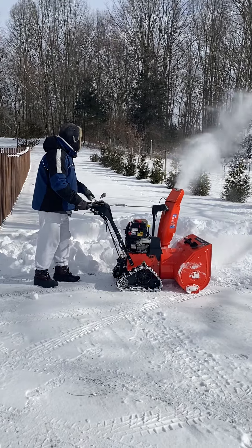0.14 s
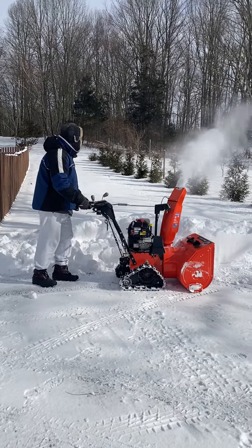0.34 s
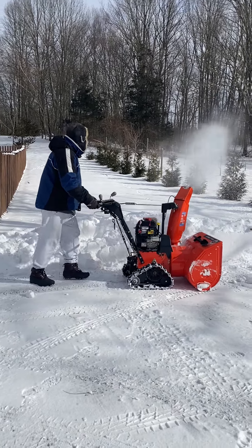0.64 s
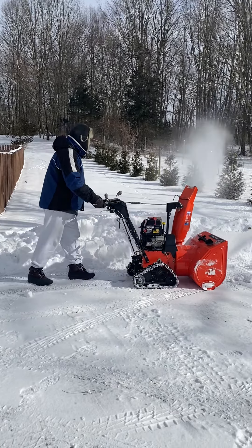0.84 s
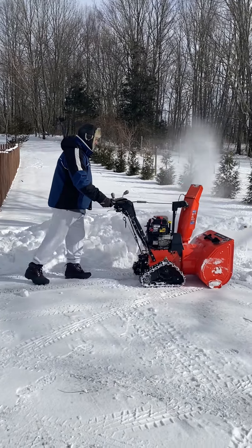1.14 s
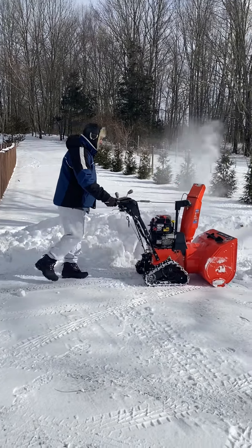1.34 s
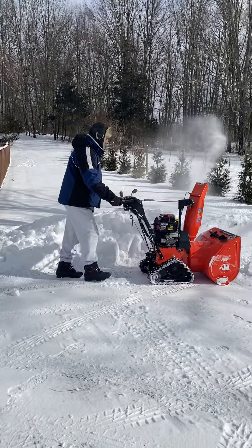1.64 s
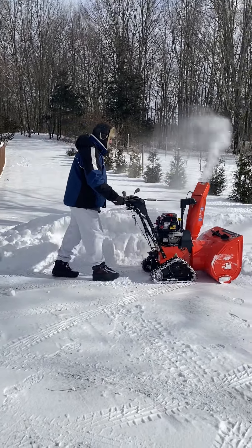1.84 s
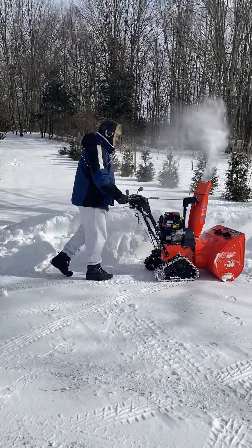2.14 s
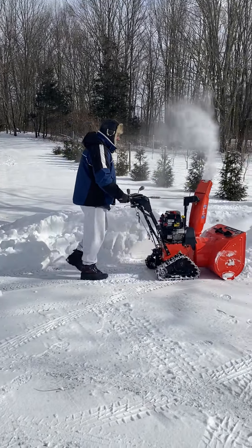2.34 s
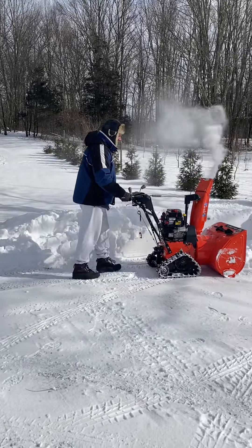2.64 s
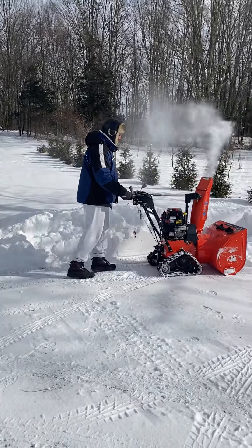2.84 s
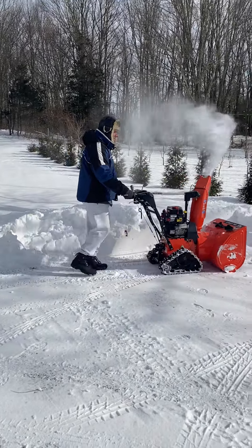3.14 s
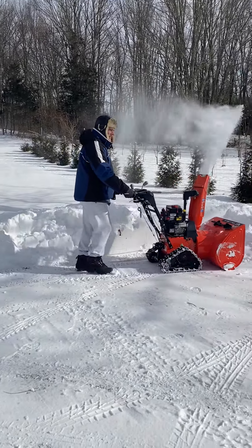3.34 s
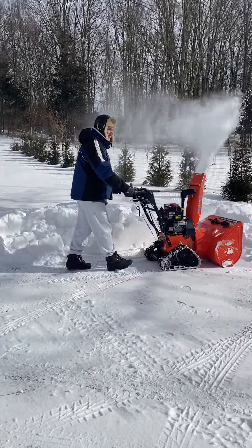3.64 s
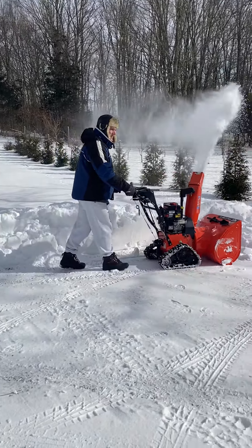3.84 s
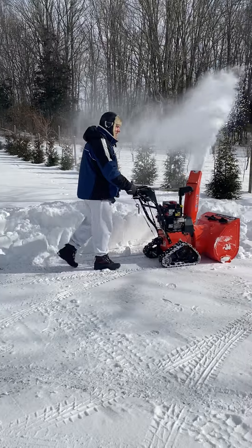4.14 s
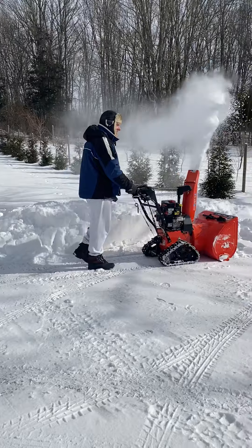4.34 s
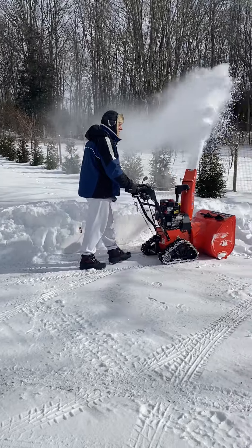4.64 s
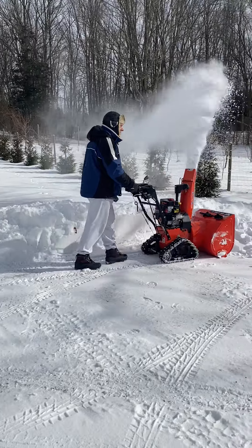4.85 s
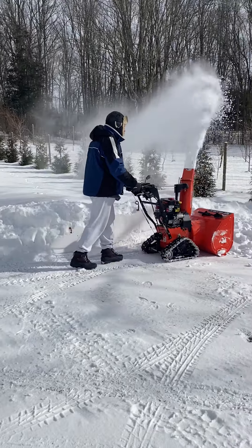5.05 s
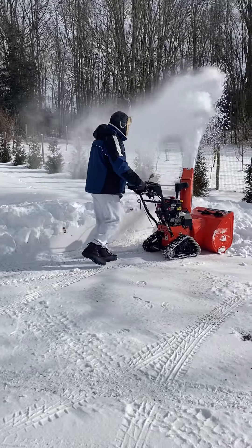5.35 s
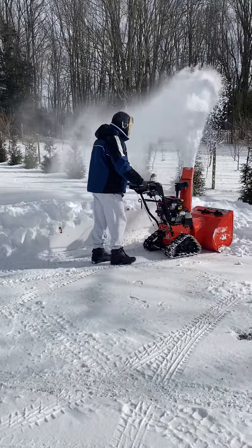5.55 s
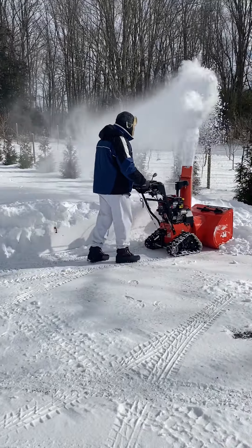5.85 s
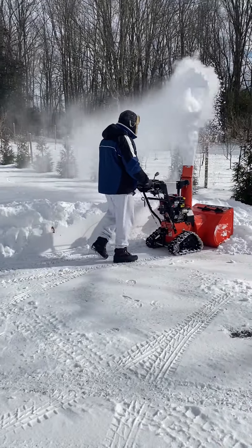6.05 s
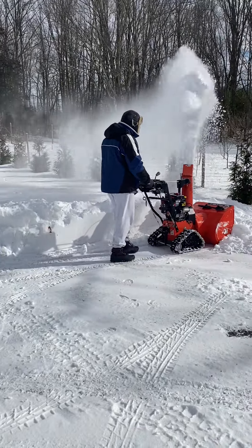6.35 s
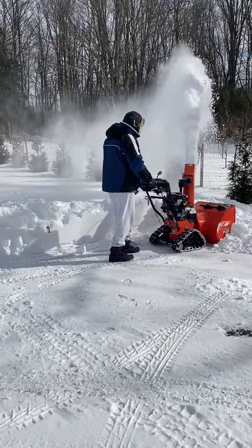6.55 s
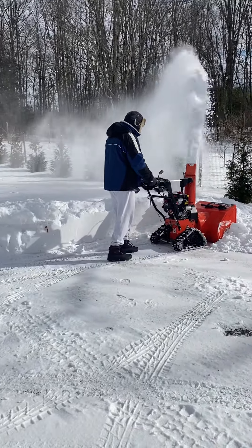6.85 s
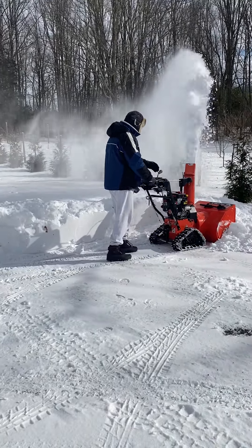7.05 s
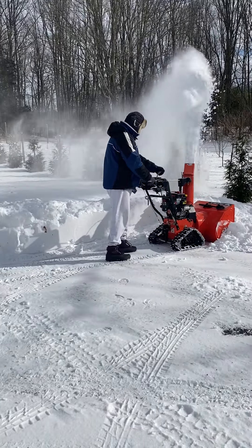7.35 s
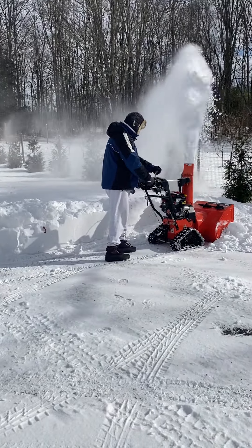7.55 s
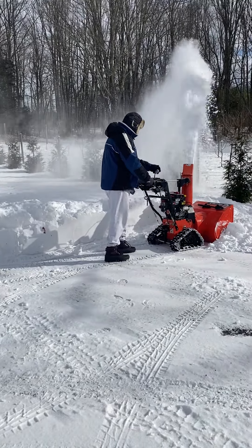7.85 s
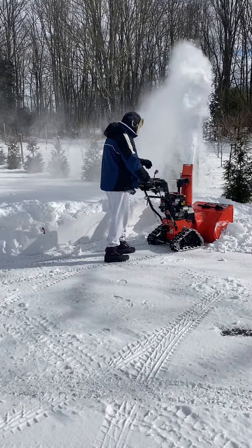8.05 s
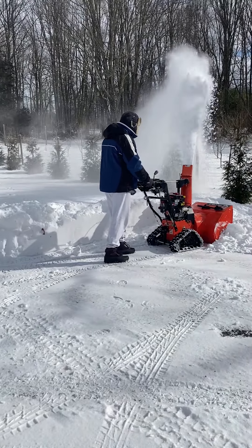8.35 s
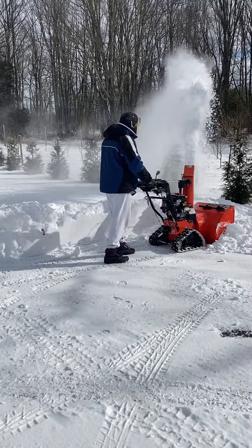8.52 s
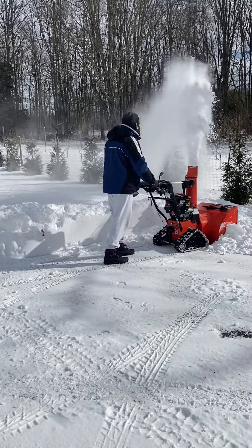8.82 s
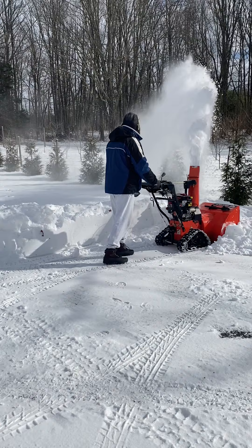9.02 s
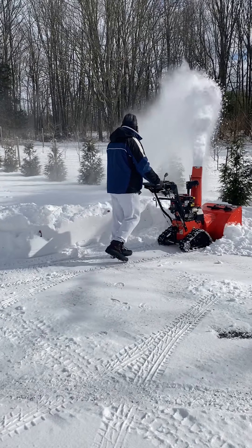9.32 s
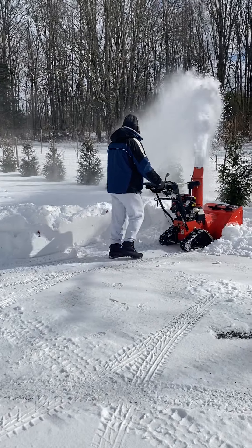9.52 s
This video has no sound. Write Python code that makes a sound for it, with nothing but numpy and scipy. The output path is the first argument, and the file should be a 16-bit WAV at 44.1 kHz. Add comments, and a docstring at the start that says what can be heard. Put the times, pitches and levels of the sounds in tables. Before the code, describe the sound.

A tracked snowblower heard from a few metres in an open yard: first a light, quick engine putter with ringing scrapes, dull bumps and scattered ticks of ice. Then the load rises, the pitch drops and wavers, exhaust blasts harden into a rasp, and a bright snow hiss swells over singing steel panels. A loud double clack strikes near the end while the labouring engine continues, faintly receding.

```python
"""A single-cylinder four-stroke snowblower creeps along: harmonics of its firings, taps and gears over noise.
At first it runs light; ringing scrapes, dull booms and clicks of ice and grit come and go.
From about 4.5 s it bites into a deep bank: the engine sags and drones, noise bursts harden into a rasp,
and filtered noise hisses like snow up the chute, with more grit clicking through the housing.
Near 8.2 s a hard double clack makes a limiter duck; the noise then fades a little as the machine moves off."""
import sys
import numpy as np
from scipy import signal
from scipy.fft import rfft, irfft, next_fast_len
from scipy.io import wavfile
from scipy.ndimage import uniform_filter1d, minimum_filter1d

SR = 44100
rng = np.random.default_rng(int(sys.argv[2]) if len(sys.argv) > 2 else 0)


def persist_wave(psi):
    """Save psi, clipped to +-1, as 16-bit WAV."""
    counts = np.round(np.clip(psi, -1, 1) * 32767).astype(np.int16)
    wavfile.write(sys.argv[1], SR, np.atleast_2d(counts).T)


N = 426888

# the bucket scrapes over crust: (time [s], half-width of the swell [s], level above the growl's base [dB])
SCRAPES = [(0.5, 0.17, 12.5), (1.4, 0.086, 23), (2.075, .07, 21), (2.634, 0.045, 18), (2.847, 0.11, 24.5),
           (4.067, 0.045, 26), (4.38, 0.031, 26), (4.573, 0.1, 23), (6.913, 0.25, 14)]
# exhaust puff running light and under load: (place in the cycle [0-1], smear of the harmonics [rad])
PUFF_LIGHT, PUFF_LOADED = (.7, -.315), (.9, -.6)


def from_db(db):
    """Decibels to gain."""
    return 10 ** (np.asarray(db) / 20)


def rms_one(x):
    """Scale to an average strength (rms) of 1."""
    return x / np.sqrt(np.mean(x ** 2) + 1e-20)


def in_time(rows):
    """Each column of a time table, read at every sample."""
    s, *columns = np.transpose(rows)
    return [np.interp(np.arange(N) / SR, s, column) for column in columns]


def at_hz(points, hz):
    """Read a spectrum table on a log-frequency axis."""
    points = np.array(points)
    return np.interp(np.log(hz + 1e-9), np.log(points[:, 0]), points[:, 1])


def drift(per_s):
    """Smooth random wandering with spread 1; a higher per_s wanders faster."""
    step = 40  # samples between computed points
    r = np.exp(-2 * np.pi * step * per_s / SR)
    kicks = rng.standard_normal(N // step + 2002)
    slow = signal.lfilter([1], [1, -2 * r, r * r], kicks)[2000:]  # drop the start-up
    return np.interp(np.arange(N) / step, np.arange(len(slow)), rms_one(slow))


def noise(spectrum):
    """Noise of a given colour, rms 1."""
    size = next_fast_len(N, True)
    hz = np.arange(size // 2 + 1) * SR / size
    white = rfft(rng.standard_normal(size))
    return rms_one(irfft(white * from_db(at_hz(spectrum, hz)), size)[:N])


def resonate(x, hz, width):
    """One resonance with gain 1 at its top."""
    r = np.exp(-np.pi * width / SR)
    top = np.array([1, 0, -1]) * (1 - r * r) / 2
    return signal.lfilter(top, [1, -2 * r * np.cos(2 * np.pi * hz / SR), r * r], x + 1e-18)


def body(x, modes):
    """A solid part rings at several resonances at once, added with alternating signs."""
    return sum((-1) ** k * from_db(db) * resonate(x, hz, width)
               for k, (hz, width, db) in enumerate(modes))


def each_cycle(cycle, spread_db):
    """A new random gain for every engine cycle."""
    gains = from_db(spread_db * rng.standard_normal(400))
    return gains[np.floor(cycle).astype(int) + 2]


def burst(cycle, place, width):
    """A bell-shaped opening once a cycle."""
    away = cycle - place
    return np.exp(-.5 * ((away - np.rint(away)) / width) ** 2)


def swells(s, length):
    """A bell-shaped swell around one moment."""
    return np.exp(-.5 * ((np.arange(N) / SR - s) / length) ** 2)


def puff_phase(puff, k):
    """Lag of harmonic k: the puff's place in the cycle plus the spread of its echoes in the muffler."""
    place, smear = puff
    return 2 * np.pi * k * place + smear * k * k


def exhaust_note(cycle, speed, load, waver_db=1.0, rough_db=1.45, strain_db=2.6, wander_rad=0.46):
    """Harmonics of the firing rate slide through the muffler's resonances and grow rougher under load."""
    # exhaust note running light, at half load and at full load:
    # (frequency [Hz], peak level of a harmonic there before wavering and exhaust loudness [dB])
    note_light, note_half, note_loaded = [(29, -61), (58, -23), (87, -31), (116, -45.5), (145, -26),
                                          (174, -20.5), (203, -23.5), (232, -32), (261, -25), (290, -35.5),
                                          (330, -57), (410, -44.5), (480, -64)], [(28, -54), (56, -18), (84, -25), (112, -28.5),
                                                              (140, -18), (168, -27.5), (196, -23.5),
                                                              (224, -21.5), (252, -36.5), (280, -47),
                                                              (370, -35), (480, -43.5), (540, -63)], [(27, -69), (52, -17),
                                                                                 (80, -16), (106, -19.5),
                                                                                 (127, -25), (138, -27),
                                                                                 (162, -21.5), (180, -36.5),
                                                                                 (193, -24.5), (208, -17.5),
                                                                                 (231, -36.5), (246, -25),
                                                                                 (285, -42), (345, -64),
                                                                                 (420, -37), (482, -54),
                                                                                 (530, -45)]
    t, coarse = np.arange(N), slice(None, None, 40)  # levels need only every 40th sample
    speed, load = speed[coarse], load[coarse]
    light, heavy = np.maximum(1 - 2 * load, 0), np.maximum(2 * load - 1, 0)
    blend = [(light, note_light), (1 - light - heavy, note_half), (heavy, note_loaded)]
    working = np.interp(t, t[coarse], 1 - light)
    out, together = 0, drift(1.0)[coarse]
    for k in np.arange(1, 21):
        level_db = sum(share * at_hz(note, k * speed) for share, note in blend)
        own_waver_db = (rough_db + strain_db * load) * drift(13.4)[coarse]
        level_db += min(k / 10, 1) * (waver_db * together + own_waver_db)
        # the puff changes shape as the throttle opens; turn each phase the short way round
        turn = puff_phase(PUFF_LOADED, k) - puff_phase(PUFF_LIGHT, k)
        change = np.angle(np.exp(1j * turn))
        lag = puff_phase(PUFF_LIGHT, k) + working * change
        if 3 < k < 9:
            lag = lag + wander_rad * working * drift(4.0)  # no two labouring strokes burn alike
        gain = np.interp(t, t[coarse], from_db(level_db))
        out = out + gain * np.sin(2 * np.pi * k * cycle - lag)
    return out


def lugging(cycle, speed, ease_db=5.0, waver_db=0.2):
    """As the engine sags, every second stroke falls short and a drone grows between the harmonics."""
    # drone tones: (multiple of the firing rate [1], peak level at the deepest sag, before wavering [dB])
    drone_tones = [(3.5, -20), (8.5, -26.5)]
    level_db = -ease_db * (speed - speed.min())  # ease_db quieter for each firing per s above the slowest
    out = 0
    for k, db in drone_tones:
        gain = from_db(db + level_db + waver_db * drift(3.7))
        out = out + gain * np.sin(2 * np.pi * k * cycle + 1.0 * drift(5.8))
    return out


def knocks(cycle, load, level_db=-29, load_db=-5, rattle_width=0.11):
    """Piston and valves tap the block at fixed places in the cycle, each tap with a short loose rattle."""
    # taps in each cycle: (place in the cycle [0-1], relative level [dB])
    tap_places = [(0.021, 1), (0.181, 2.5), (0.439, 0), (.73, 6.5)]
    # engine block and shrouds: (frequency [Hz], width [Hz], level [dB])
    block_modes = [(510.5, 26, 0.5), (609, 36, 4), (687, 130, 1), (836.5, 75, 2.5), (995, 60, -1.5),
                   (1206, 87, -5.5), (1520, 280, -12), (1863, 82, -8), (2216, 64, -6.5), (2830, 160, -17.5),
                   (3165, 86, -13.5), (3720, 136, -12.5)]
    taps = np.zeros(N)
    for place, db in tap_places:
        tap = np.diff(np.floor(cycle - place), prepend=np.floor(-place))  # one click a cycle
        loose = .04 * burst(cycle, place + rattle_width, rattle_width) * rng.standard_normal(N)
        taps += from_db(db) * each_cycle(cycle - place + .5, 1.3) * (tap + loose)
    return from_db(level_db + load_db * load) * rms_one(body(taps, block_modes))


def gears(cycle, load, load_db=-9, waver_db=2.5, place=0.039):
    """Timing gears, loaded by the cam once a cycle, sing thin lines that fade as the engine labours."""
    # whirr: (multiple of the firing rate [1], peak level before wavering and load [dB])
    gear_tones = [(14, -44), (17, -45), (21, -42), (22, -44), (24, -41), (26, -44), (29, -35.5)]
    lines = 0
    for k, db in gear_tones:
        gain = from_db(db + waver_db * drift(0.97))
        lines = lines + gain * np.sin(2 * np.pi * k * (cycle - place) + 0.97 * drift(0.82))
    return from_db(load_db * load) * lines


def work_levels(speed, load):
    """Levels [dB] of rumble, rasp and hiss: scrapes lift rumble and rasp; load and sag lift rasp and hiss."""
    sag = 29.1 - speed  # firings per s below the free-running speed
    scrape = sum(from_db(db / 2) * swells(s, length) for s, length, db in SCRAPES)
    scrape = scrape / scrape.max()
    # the machine moves off and the operator shields it: loss [dB], heading for its full value at 10 s
    away_db = np.interp(np.arange(N) / SR, [8.1, 10], [0, 1.65])
    rumble_db = -25 + 4 * scrape - away_db + 1 * drift(2.6)
    rasp_db = -31 + 5.5 * load + 0.85 * sag + 1.5 * scrape - away_db
    hiss_db = -39.5 + 10 * load + 0.51 * sag - away_db + 1.0 * drift(6.2)
    return rumble_db, rasp_db, hiss_db


def recolour(x, cycle, spread_db=1.26):
    """No two blasts have the same colour: each of four bands gets its own strength in every cycle."""
    size = next_fast_len(N, True)
    spectrum, hz = rfft(x, size), np.arange(size // 2 + 1) * SR / size
    band = np.digitize(hz, [900, 1800, 3600])
    return sum(irfft(spectrum * (band == k), size)[:N] * each_cycle(cycle - .4, spread_db)
               for k in range(4))


def rasp_gate(cycle, load, light=0.061, loaded=2.18, place=0.877, width=0.065, shoulder=.45):
    """Gas tears out as the exhaust valve opens: shoulder, main blast, after-puff, uneven, harder with load."""
    parts = [(1, place, width), (shoulder, 0.68, 0.06), (.17, 0.15, 0.1)]  # (size, place, width)
    blast = sum(size * burst(cycle, at, spread) * each_cycle(cycle - at + .5, 1.3)
                for size, at, spread in parts)
    gate = 1 + (light + loaded * load) * blast
    return gate / np.sqrt(uniform_filter1d(gate ** 2, size=SR // 3))  # keeps the average level even


def spray(grain_db=2.0):
    """Snow crystals rush up the chute in small clumps: noise whose level flickers quickly."""
    # colour of the hiss: (frequency [Hz], level per Hz [dB])
    hiss_colour = [(1200, -12), (2500, -8.5), (3000, 1), (3250, 0), (3900, -1), (4900, 2), (5600, 2),
                   (6600, 1), (8300, -5.5), (9200, -3), (11000, -4.5), (12500, -6.5), (15500, -15.5)]
    return rms_one(noise(hiss_colour) * from_db(grain_db * drift(135)))


def rushing(cycle, load, levels):
    """Turbulence: exhaust rasp, hollow when light, fuller under load; snow hiss; throbbing housing rumble."""
    # colours of rumble, light rasp and loaded rasp: (frequency [Hz], level per Hz [dB])
    rumble_colour, light_colour, loaded_colour = [(25, -24), (45, -2), (100, -0.5), (200, 7), (310, 2.5),
                                                  (380, -3), (470, -5), (600, -12.5), (900, -8),
                                                  (1500, -24), (3000, -108)], [(200, 0), (450, 2.5), (600, 2.5),
                                                                  (750, 4.5), (1080, -0.5), (1330, 4.5),
                                                                  (1750, 0.5), (2200, 0.5), (2480, -1.5),
                                                                  (2800, 2), (3010, -16), (3180, -0.5),
                                                                  (3450, -12.5), (3700, -2.5), (4050, -8.5),
                                                                  (4400, -3.5), (4750, -15.5), (5100, -6),
                                                                  (7000, -21.5), (14000, -24.5)], [(200, -27), (450, 8),
                                                                                      (750, -2.5),
                                                                                      (1080, 0.5),
                                                                                      (1330, 2.5),
                                                                                      (1750, -3.5),
                                                                                      (2050, -2),
                                                                                      (2450, -6),
                                                                                      (2780, -1.5),
                                                                                      (3200, -10),
                                                                                      (4200, -9),
                                                                                      (5200, -10),
                                                                                      (7000, -25),
                                                                                      (14000, -22.5)]
    rumble_db, rasp_db, hiss_db = levels
    gas = np.sqrt(1 - load) * noise(light_colour) + np.sqrt(load) * noise(loaded_colour)
    rasp = from_db(rasp_db) * recolour(gas, cycle) * rasp_gate(cycle, load)
    snow_gate = rasp_gate(cycle, load, light=0.047, loaded=1.23, place=0.966, width=0.087, shoulder=.1)
    hiss = from_db(hiss_db) * spray() * snow_gate
    throb = rms_one(1 + 1.0 * burst(cycle, place=.08, width=.2))  # each firing shakes the housing
    rumble = from_db(rumble_db) * noise(rumble_colour) * throb
    return rasp + hiss + rumble


def whine(cycle, speed, load, waver_db=1.5):
    """Under strain, whichever harmonic slides into a muffler resonance sings out cleanly."""
    # muffler resonances: (frequency [Hz], width [Hz], level before strain, waver and exhaust loudness [dB])
    muffler = [(250, 28, -22), (485, 27, -32)]
    strain = np.minimum(2 * load, 1)
    out = 0
    for k in (9, 10, 17, 18, 19):
        gain = sum(from_db(db) * np.exp(-2 * ((k * speed - hz) / width) ** 2) for hz, width, db in muffler)
        out = out + gain * np.sin(2 * np.pi * k * cycle - puff_phase(PUFF_LOADED, k))
    return strain * from_db(waver_db * drift(2.5)) * out


def panels(load):
    """Rubbing snow keeps the steel housing singing: noise through narrow resonances, louder with load."""
    # steel panels: (frequency [Hz], width [Hz], level at full load [dB])
    panel_rings = [(1178, 9.5, -42.5), (2370, 8.3, -40.5), (3080, 27, -42.5), (4250, 12, -57)]
    out = 0
    for hz, width, db in panel_rings:
        once = resonate(rng.standard_normal(N), hz, 2 * width)
        out = out + from_db(db) * rms_one(resonate(once, hz, 2 * width))
    return load * out


def strikes(rows, decay_s, level_db, dull_hz=3000, detune=0.064):
    """Each piece snaps, shatters in a short crunch and rings its own spot of the chute; some add a dull part."""
    # ring of the chute: (frequency before detuning [Hz], width [Hz], level [dB])
    chute_modes = [(1320, 490, -2.5), (2110, 310, 0.5), (2760, 330, 3), (3890, 200, 3.5), (4360, 450, 4),
                   (5470, 550, 4), (6200, 820, 1), (9100, 3100, -1), (11150, 2900, -4.5), (15500, 2000, -3)]
    snap_s, snap_hz, snap_db = .002, 4500, -9  # decay, lower edge, level relative to the crunch
    out, age = np.zeros(N), np.arange(SR // 12) / SR
    high = signal.butter(2, dull_hz, "high", fs=SR, output="sos")
    low = signal.butter(2, dull_hz, "low", fs=SR, output="sos")
    bright = signal.butter(2, snap_hz, "high", fs=SR, output="sos")
    for s, db, dull_db in rows:
        crunch = from_db(db + level_db) * np.exp(-age / decay_s) * rng.standard_normal(len(age))
        dull = 2 * from_db(dull_db) * signal.sosfilt(low, crunch)
        blow = signal.sosfilt(high, crunch) - dull
        spot = [(hz * (1 + detune * rng.uniform(-0.36, 1)), width, mode_db)
                for hz, width, mode_db in chute_modes]
        snap = from_db(snap_db) * signal.sosfilt(bright, crunch * np.exp(-age / snap_s))
        out[int(s * SR):int(s * SR) + len(age)] += body(blow, spot) + snap
    return out


def growl(spread_db=5):
    """The bucket sticks and slips on the crust; every slip rings its modes with new strengths."""
    # ring of the bucket: (frequency [Hz], width [Hz], relative level [dB])
    bucket_modes = [(185, 37, -9), (306, 21, 8.5), (352, 28, 2), (433, 30, -5.5), (536, 27, -1.5),
                    (750, 87, -10)]
    base_db, slips_per_s = -48.5, 48  # the slip rate wanders around this value
    travel = np.cumsum(slips_per_s * np.exp(.5 * drift(40))) / SR
    slips = np.diff(np.floor(travel), prepend=0)
    ring = 0
    for hz, width, db in bucket_modes:
        strength = from_db(spread_db * np.tanh(rng.standard_normal(N)))
        ring = ring + from_db(db) * resonate(slips * strength, hz, width)
    return rms_one(ring) * sum(from_db(base_db + db) * swells(s, length) for s, length, db in SCRAPES)


def bumps():
    """The bucket bumps over packed snow; each bump is a quick, dull boom at one pitch."""
    # bumps: (time [s], pitch [Hz], peak level [dB])
    bump_times = [(1.53, 75, -24), (1.587, 130, -16), (1.645, 95, -24), (1.715, 63, -21), (2.86, 275, -27),
                  (4.384, 172, -26), (4.497, 101, -16), (4.518, 250, -22), (6.88, 148, -25),
                  (7.849, 68, -13), (7.866, 139, -18)]
    rise_s, decay_s = .008, .028
    out, age = np.zeros(N), np.arange(SR // 4) / SR
    shape = (1 - np.exp(-age / rise_s)) * np.exp(-age / decay_s)
    for s, hz, db in bump_times:
        tone = np.sin(2 * np.pi * (hz * age + rng.random()))
        out[int(s * SR):int(s * SR) + len(age)] += from_db(db) * shape / shape.max() * tone
    return out


def fine_grit(count=10):
    """Rows for small bits of grit, scattered in time and strength once the bucket has bitten."""
    first_s, last_s = 4.5, (N - SR // 5) / SR
    when, size = rng.random((count, 2)).T
    # middle level -31 dB, up to 2 dB either way; dull part -22 dB
    return [(first_s + w * (last_s - first_s), -31 + 2 * (2 * u - 1), -22) for w, u in zip(when, size)]


def ports(direct, scattered):
    """Two microphone ports hear the machine with their own level and phase; yard scatter differs between them."""
    # share of the sound that the yard scatters: (frequency [Hz], level [dB])
    scatter = [(60, -15), (250, -23), (600, -19), (2000, -10.5), (2700, -5), (4500, -7.5), (8000, -104),
               (15000, -4)]
    # balance of the ports: (frequency [Hz], left minus right [dB])
    balance = [(200, 0), (320, -.7), (630, 3), (820, 12), (1150, 6), (1550, 6.5), (2000, 1), (2800, 2),
               (3400, 3), (4900, -2.5), (6000, 0)]
    # the gap between the ports turns the phase of the treble: (frequency [Hz], lead of the left [rad])
    phase = [(0, 0), (200, 0), (450, .5), (620, .6), (750, 1), (900, .1), (1100, -.3), (1700, -.25),
             (2100, .1), (2400, .8), (2550, .4), (2850, 1.1), (3500, .1), (5000, .4), (5400, 1.3),
             (16500, 12.4)]
    size = next_fast_len(N + SR // 4, True)
    hz = np.arange(size // 2 + 1) * SR / size
    sides = np.array([[1], [-1]])  # left, right
    field = rfft(direct, size) + sides * from_db(at_hz(scatter, hz)) * rfft(scattered, size)
    tilt = from_db(sides * at_hz(balance, hz) / 2)
    lead = np.exp(1j * sides * np.interp(hz, *np.transpose(phase)) / 2)
    return irfft(field * lead * tilt / tilt.mean(axis=0), size)[:, :N]


def scene():
    """Speed and load drive the engine and the rushing noise; ice, scrapes and bumps are added."""
    # engine speed, pulled down by the snow and caught by the governor: (time [s], firing rate [1/s])
    speed_curve = [(0.0, 28.97), (2.3, 29.13), (4.7, 28.48), (4.8, 27.97), (5.02, 28.35), (5.82, 27.0),
                   (5.98, 26.36), (6.78, 25.11), (7.04, 26.92), (7.5, 27.29), (7.8, 28.21), (8.0, 27.5),
                   (8.28, 28.75), (8.62, 26.94), (8.8, 28.54), (9.2, 26.67), (9.46, 27.25), (9.68, 26.12)]
    # engine effort: (time [s], load [0-1], exhaust loudness [dB])
    load_curve = [(0, 0, -0.5), (1.2, 0.05, 1.1), (3.1, 0.05, 1.5), (3.7, 0.18, 3), (4.6, 0.36, 0),
                  (5.6, 0.65, -0.5), (6.2, 1, -3), (7.7, 0.86, 0), (8.9, 0.7, -1), (9.68, 0.98, -2.5)]
    # larger bits of ice hitting the chute:
    # (time [s], crunch level before the lift below [dB], dull part before doubling, relative to it [dB])
    ice_bits = [(.163, -41, 11), (1.072, -53, 22), (2.212, -28.5, -5), (2.36, -33, -9), (2.742, -30, 2),
                (2.787, -28, -20), (2.98, -30.5, -3), (3.0, -29, -10), (3.66, -23, -30), (3.942, -25, -24),
                (4.056, -45, 16), (4.139, -29.5, -26), (4.305, -31, -22), (4.444, -23, -26),
                (5.09, -19, -30), (5.222, -10.5, -28), (5.228, -17.5, -18), (5.475, -31, -17),
                (5.515, -26, -12), (5.847, -33, -10), (6.266, -24, -6), (6.452, -24.5, -6),
                (6.572, -26, -9), (7.006, -23.5, -4.5), (7.228, -25.5, -3), (7.265, -22.5, -17),
                (7.842, -24, -12), (8.132, -41, 7), (8.234, -22, -17), (8.306, -16.5, -34.5),
                (8.633, -32, 2), (8.783, -21, -26), (9.174, -30, -3), (9.353, -21, -20)]
    # a hard lump caught by the impeller:
    # (time [s], crunch level [dB], dull part before doubling, relative to it [dB])
    lump_hits = [(8.182, -5, -2), (8.198, -4, 6.5)]
    speed, = in_time(speed_curve)
    load, exhaust_db = in_time(load_curve)
    load = np.clip(load, 0, 1)
    cycle = np.cumsum(speed) / SR + .010 * drift(1.25)  # the crank wanders by hundredths of a cycle
    levels = work_levels(speed, load)
    # strokes differ by about 0.6 dB, smoothed over 5 ms
    stroke = uniform_filter1d(each_cycle(cycle - PUFF_LIGHT[0], .6), size=SR // 200)
    exhaust = stroke * exhaust_note(cycle, speed, load) + whine(cycle, speed, load)
    exhaust = from_db(exhaust_db) * exhaust
    engine = exhaust + lugging(cycle, speed) + knocks(cycle, load) + gears(cycle, load)
    ice = strikes(ice_bits + fine_grit(), decay_s=.005, level_db=10.5)
    ice = ice + strikes(lump_hits, decay_s=.0068, level_db=0)
    direct = engine + rushing(cycle, load, levels) + panels(load) + bumps() + growl() + ice
    return ports(direct, scattered=rushing(cycle, load, levels))


def limiter(x, top_db=0.0, release_db_per_s=17):
    """Peaks above the top push the gain of both channels down at once; it creeps back."""
    recovery = release_db_per_s * np.arange(N) / SR
    over = np.maximum(20 * np.log10(np.abs(x).max(axis=0) + 1e-9) - top_db, 0)
    gain_db = recovery - np.maximum.accumulate(over + recovery)
    held_db = minimum_filter1d(gain_db, size=221)  # 5 ms, so the smoothed dip is in place at the peak
    return x * from_db(uniform_filter1d(held_db, size=221))


def record(dry):
    """Limiter, then a steep filter cuts the top above 16 kHz."""
    top_cut = signal.ellip(10, .1, 80, 16000, fs=SR, output="sos")
    return signal.sosfilt(top_cut, limiter(dry))


dry = scene()
out = record(dry)
persist_wave(out)
```